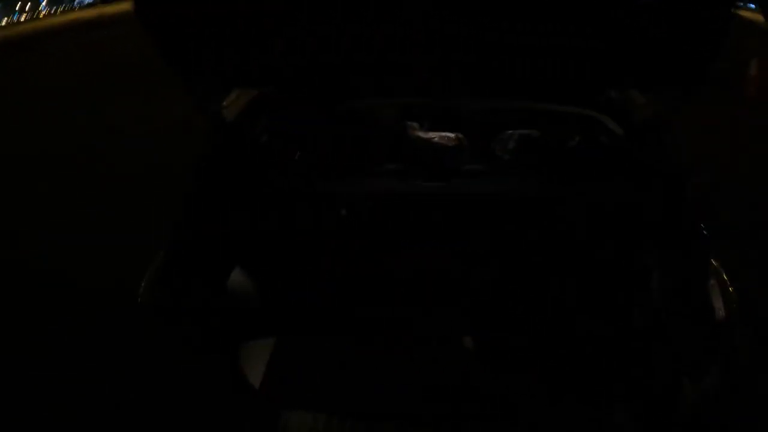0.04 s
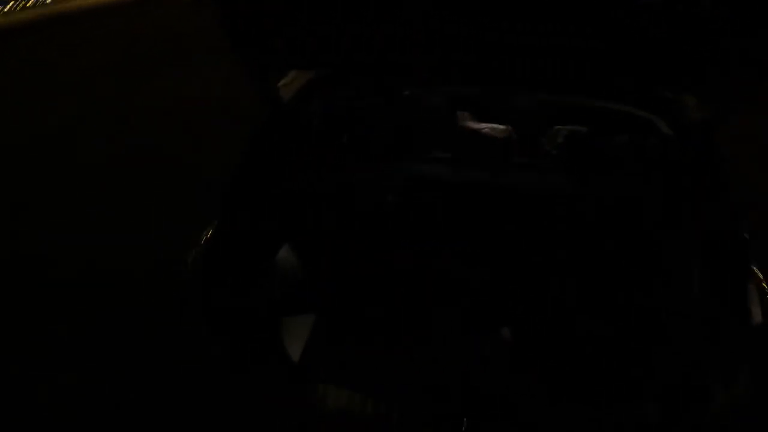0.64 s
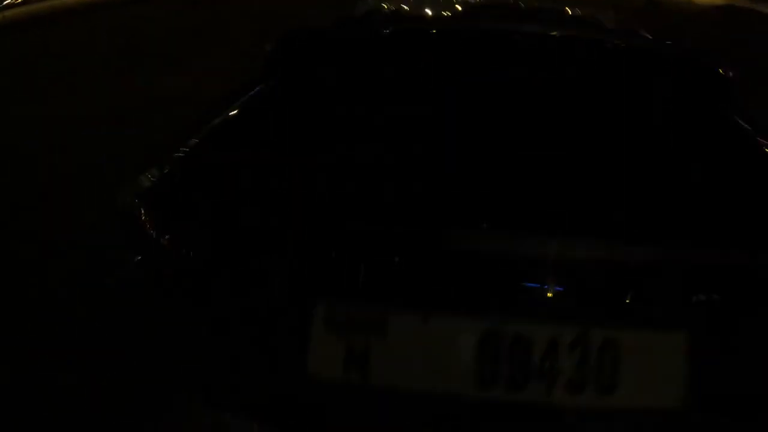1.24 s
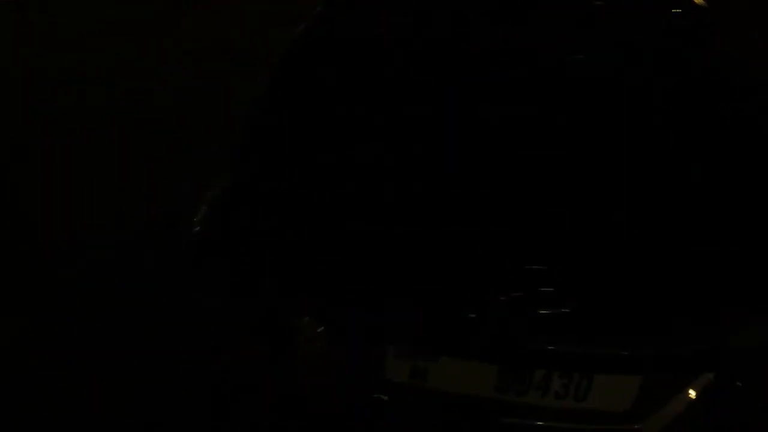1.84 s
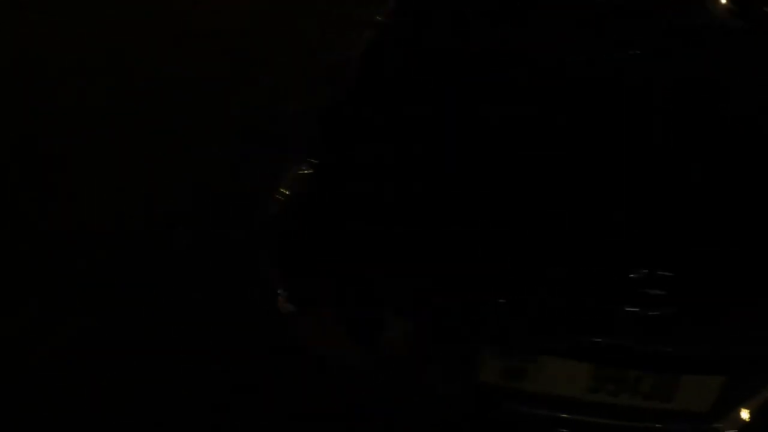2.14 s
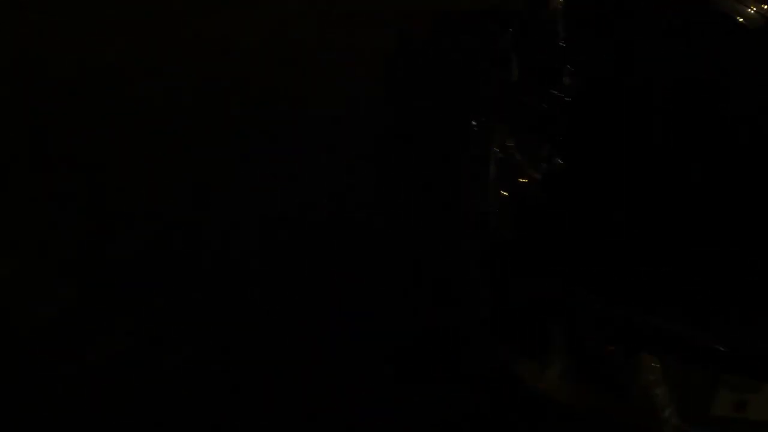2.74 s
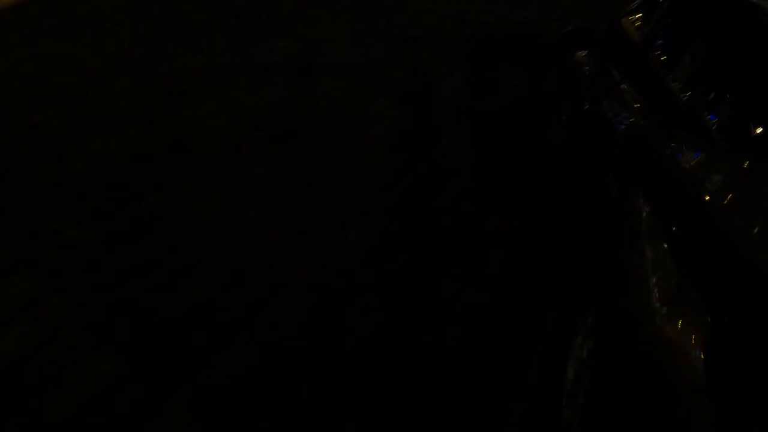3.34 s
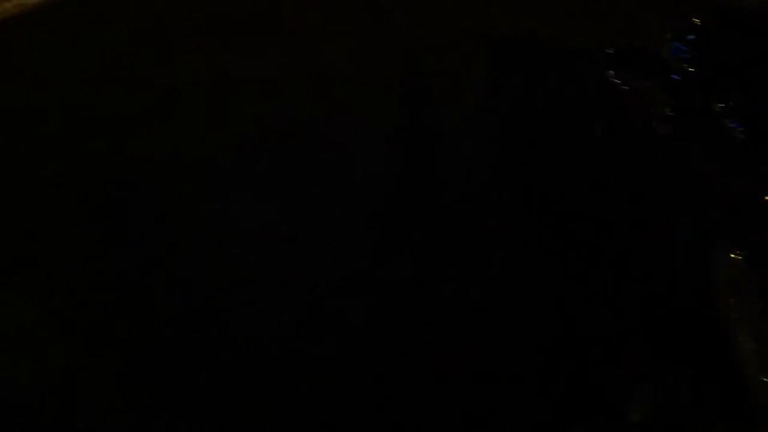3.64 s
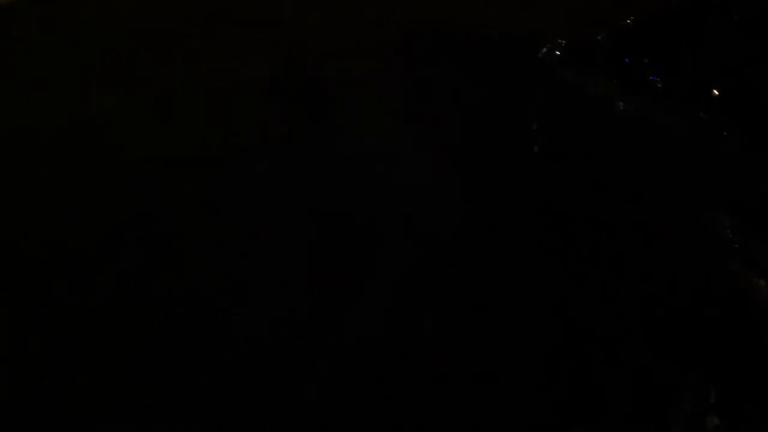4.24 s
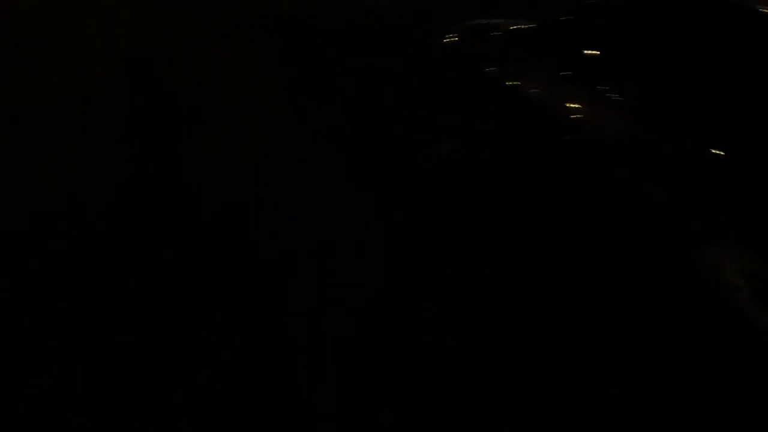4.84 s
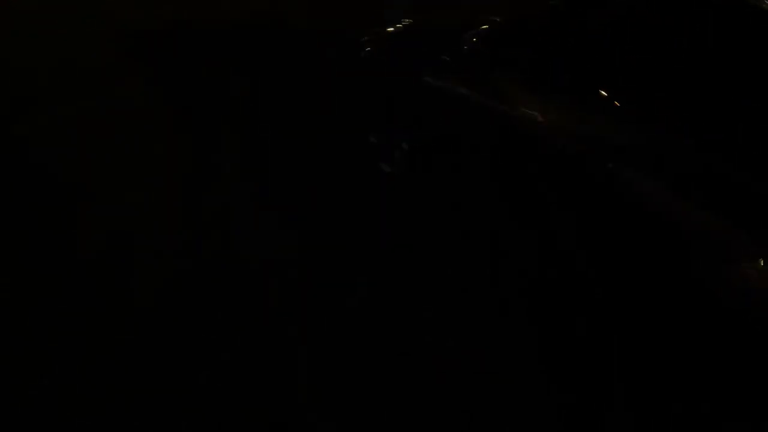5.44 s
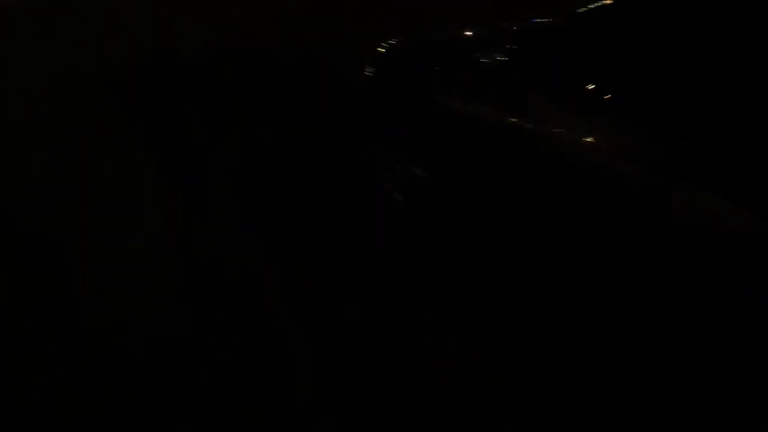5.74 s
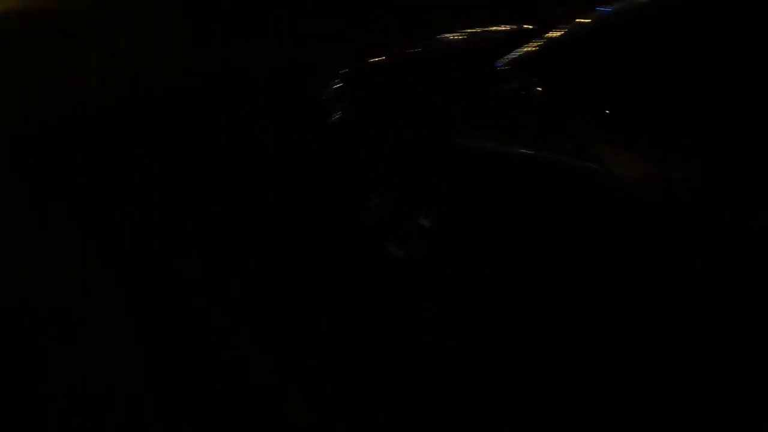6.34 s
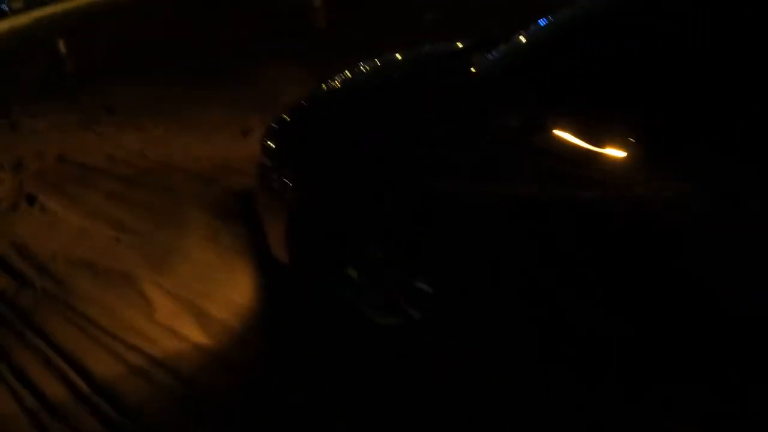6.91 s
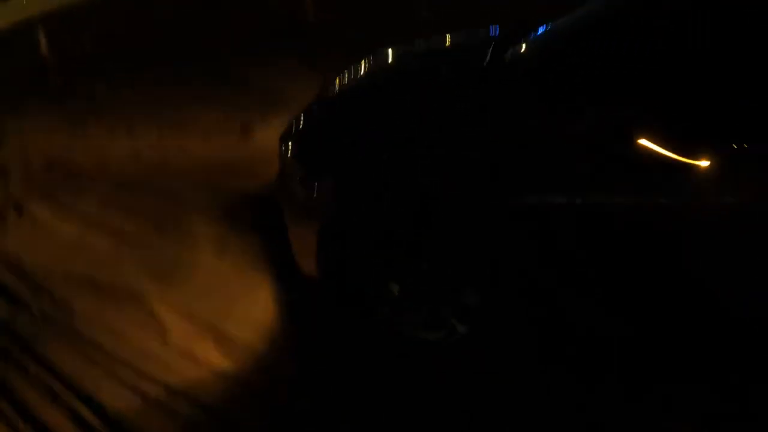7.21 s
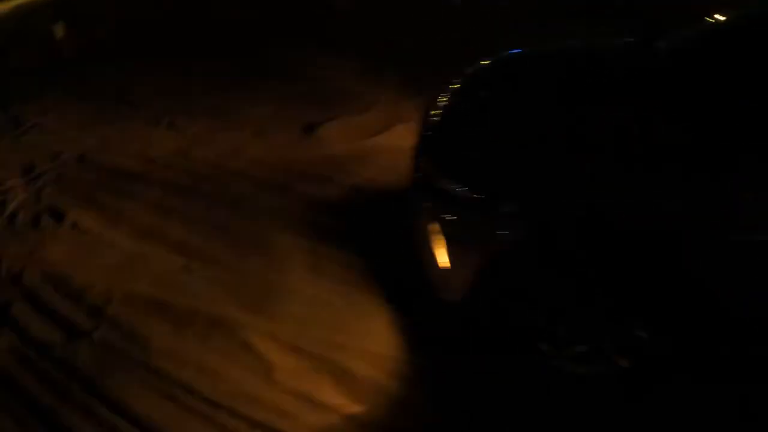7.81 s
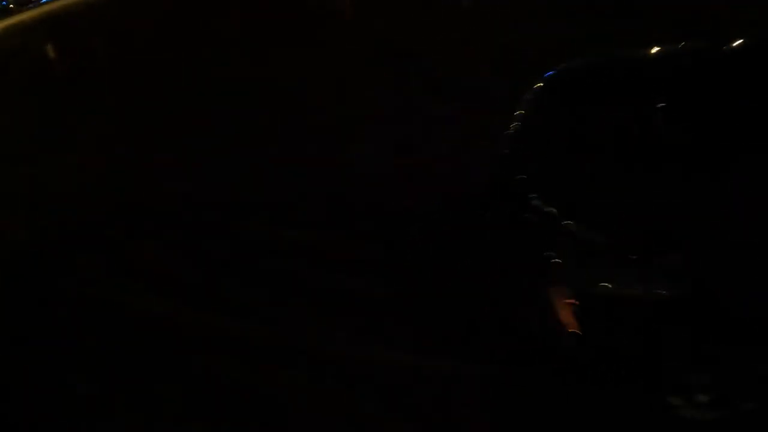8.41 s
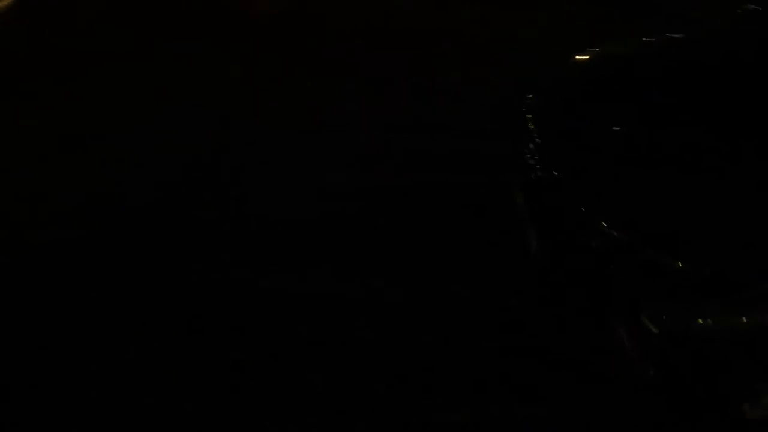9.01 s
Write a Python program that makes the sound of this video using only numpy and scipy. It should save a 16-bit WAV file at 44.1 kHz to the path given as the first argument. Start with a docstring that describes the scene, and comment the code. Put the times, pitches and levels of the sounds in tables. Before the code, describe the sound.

A steady low rumble of road traffic and tyre noise fills an outdoor space throughout. Right at the start, at about 0.1 seconds, a car's door latch opens close ahead with a boxy clack. A dull footstep and a few gritty ticks follow around 0.6 seconds, as a vehicle swells past. At about 1.7 seconds the door slams shut, the loudest sound: a solid thud with a brief metal ring, a deep boom and a short, dull echo. The background dips under the slam and creeps back. From about 2.3 seconds to the end, slow, faint steps scuff over sand, with small clicks of grit and soft swishes of cloth, slightly to the left. Distant engines hum beneath them. Between about 6.5 and 9 seconds another vehicle passes, its tyre roar swelling gently with a faint whine that falls in pitch around 8 seconds.

```python
"""A car's door latch clacks open at night beside a busy road. A moment later the door is swung shut:
seal, latch and striker meet within 30 ms, the steel panels ring and the cabin air booms. An automatic
gain ducks under the slam and creeps back. Traffic rumbles on and one vehicle's tyres sing as it
passes, while slow steps tick and rustle on the sandy ground."""
import sys
import numpy as np
from scipy import signal
from scipy.fft import rfft, irfft, next_fast_len
from scipy.io import wavfile
from scipy.ndimage import uniform_filter1d

SR = 44100
rng = np.random.default_rng(int(sys.argv[2]) if len(sys.argv) > 2 else 0)


def master(y):
    """Save y as 16-bit WAV."""
    cut = np.clip(np.atleast_2d(y).T, -1, 1)
    pcm = np.round(cut * 32767)  # scale
    wavfile.write(sys.argv[1], SR, pcm.astype(np.int16))


N = 399987

# Seal, latch and striker hit home; then the door shudders in its seal and the latch rattles.
# Each row: start in seconds, relative level in dB, treble tilt in dB per octave.
SLAM = [(1.673, -20.5, 1), (1.6758, -20.5, -0.5), (1.6819, -17, -2), (1.6873, -13, 2.5),
        (1.6912, -12.5, 2.5), (1.7002, -11.5, 3), (1.7027, -10, 0.5)]
SHUDDERS = [(1.724, -18, -5), (1.746, -25, -5), (1.7627, -32, 1), (1.7653, -29, 0), (1.773, -20.5, -7),
            (1.786, -21, -5), (1.812, -23, -6.5)]
# The weighty body of each hit. Each row: frequency in Hz, spectral level in dB.
DOOR_COLOUR = [(53, -30), (90, 1.5), (281, -4.5), (530, -3), (700, -10), (792, -9), (880, -12),
               (1060, -10.5), (1370, -15), (1690, -11), (2320, -22.5), (3120, -23.5), (3620, -33),
               (7400, -36), (8800, -45), (14000, -62)]
# The lows hang on longest. Each row: frequency in Hz, 60 dB decay time in seconds.
DOOR_DECAY = [(150, 0.36), (500, 0.1), (1500, 0.084), (4000, 0.065), (11000, 0.038)]
# The ring of the steel panels and latch plate, and the brighter ring of claw and striker.
# Each row: frequency in Hz, level in dB, 60 dB decay time in seconds.
PANEL_MODES = [(154.3, 1.5, 0.38), (242, 4.5, 0.33), (338, 2, 0.071), (424, -1.5, 0.14), (507, 2.5, 0.27),
               (562, 6, 0.063), (603, -5, 0.11), (813, -1, 0.1), (1033, 1.5, 0.16), (1112, 7, 0.075),
               (1360, -2.5, 0.15), (1494, -2, .1), (1690, -2, 0.053), (1970, -10, 0.068), (2460, -10, 0.13)]
CLAW_MODES = [(2510, -4, .07), (2929, -3, .06), (3070, 2, .065), (3900, -9, .04), (4540, -3, 0.038),
              (5260, -5, .04), (5997, -7, .05), (6920, -3, 0.032)]
# The panels ring as the seal lands, harder as the striker catches; the claw touches, takes the
# first notch, then locks. Each row: start in seconds, level in dB.
PANEL_BLOWS = [(1.6758, -26), (1.6885, -23), (1.7031, -18)]
CLAW_CLACKS = [(1.675, -30), (1.6885, -36), (1.7022, -23)]


def door_slam():
    """The seal brushes, latch and striker hit and ring the panels, and the door shudders to rest."""
    seal_brush = arch(1.672, half_length=0.03) * noise(DOOR_COLOUR, N, tilt_db=-6, width=0.4)
    out = amp(-33) * seal_brush
    for s, db, tilt_db in list(SLAM) + list(SHUDDERS):
        add(out, s, amp(db - 0.5) * crack(DOOR_COLOUR, DOOR_DECAY, tilt_db, attack=0.00016))
    for s, db, _ in SLAM:
        add(out, s, amp(db - 8) * skin_push())
    shudder_blows = [(s, db - 20) for s, db, _ in SHUDDERS]
    for s, db in list(PANEL_BLOWS) + shudder_blows:
        add(out, s, amp(db) * ring(PANEL_MODES, attack=0.001, scatter_db=1))
    for s, db in CLAW_CLACKS:
        add(out, s, amp(db) * ring(CLAW_MODES, attack=0.0002, scatter_db=1))
    return out


def skin_push(length_s=0.00051, rise_s=0.00017):
    """One blunt contact shoves the door skin in and lets it spring back."""
    t = np.arange(SR // 50) / SR
    return (t / length_s - 1) * np.exp(-t / length_s) * (1 - np.exp(-t / rise_s))


# The sub under the slam. Each row: frequency in Hz, relative level in dB, 60 dB decay time in seconds.
CABIN_MODES = [(51.2, -3, 0.26), (42.35, -10, 1), (26, -26, 0.26)]


def cabin_boom():
    """The door squeezes the cabin air, which throbs and dies away."""
    out = np.zeros(N)
    add(out, 1.686, amp(1.0) * ring(CABIN_MODES, attack=0.006, scatter_db=-0.5))
    return out


# The pawl lets go, the door pops off its seal, the handle springs back. Each row: start in seconds,
# relative crack level in dB, treble tilt in dB per octave, ring level in dB.
LATCH_HITS = [(0.1203, -14, 3, -17), (.1269, -21, 1, -14), (.173, -35, 3, -42)]
# A boxy clack. Each row: frequency in Hz, spectral level in dB.
LATCH_COLOUR = [(71, -30), (130, -5), (210, -8), (288, 5.5), (420, -2.5), (578, -9.5), (749, -3.5),
                (1050, -7), (1180, -11.5), (2150, -22.5), (2680, -32), (3500, -29.5), (5270, -34),
                (8010, -44), (14000, -70)]
# Its tight tail. Each row: frequency in Hz, 60 dB decay time in seconds.
LATCH_DECAY = [(200, 0.082), (900, 0.08), (2500, 0.092), (10000, 0.066)]
# The hollow door answers. Each row: frequency in Hz, level in dB, 60 dB decay time in seconds.
LATCH_MODES = [(298, 1.5, 0.066), (379, 1.5, 0.059), (687, -22, 0.25), (824, -5, 0.045),
               (1054, -17.5, 0.16), (5210, -24, 0.056)]


def latch_release(bounce_s=0.0067, bounce_loss_db=4.5, bounce_tilt_db=-1.5):
    """The pawl snaps off the striker, rings the hollow door and chatters in weaker, duller rebounds."""
    out = np.zeros((2, N))
    for s, db, tilt_db, ring_db in LATCH_HITS:
        add(out, s, amp(ring_db) * ring(LATCH_MODES, attack=0.0012, scatter_db=1))
        for bounce in range(3):
            tilt = tilt_db + bounce_tilt_db * (bounce > 0)
            contact = crack(LATCH_COLOUR, LATCH_DECAY, tilt, attack=0.00031)
            add(out, s + bounce * bounce_s, amp(db - 5.5 - bounce * bounce_loss_db) * contact)
    return out


# Dull heel knocks and small stone crunches. Each row: start in seconds, level in dB, pitch in Hz.
HEELS = [(.634, -28, 110), (.64, -43, 706), (5.088, -37.5, 915), (5.108, -46, 700), (8.430, -36, 810),
         (8.447, -40, 955)]
PEBBLES = [(5.2002, -45, 2600), (5.2558, -46, 2850), (6.411, -47, 4800)]
# The tone of each. Each row: multiple of the pitch, spectral level in dB.
HEEL_COLOUR = [(.1, -4), (.5, 1.5), (1, 7.5), (1.6, -13), (3.5, -14), (20, -58), (130, -100)]
PEBBLE_COLOUR = [(.3, -23), (.75, -3), (1, 0), (1.3, -4), (1.7, -18), (5, -40)]


def footfalls():
    """Heels knock on the ground and small stones crunch under a sole."""
    out = np.zeros((2, N))
    heel_decay, pebble_decay = [(200, 0.083), (2000, 0.093)], [(1000, 0.034), (5000, 0.029)]
    for s, db, hz in HEELS:
        add(out, s, amp(db) * crack(np.multiply(HEEL_COLOUR, [hz, 1]), heel_decay, 0, attack=0.00086))
    for s, db, hz in PEBBLES:
        add(out, s, amp(db) * crack(np.multiply(PEBBLE_COLOUR, [hz, 1]), pebble_decay, 0, attack=0.0006))
    return out


# Shoe scuffs. Each row: middle and half length in seconds, level in dB, treble tilt in dB per octave.
SCUFFS = [(.47, 0.12, -64, 24), (1.227, 0.021, -40, -4.5), (2.31, 0.13, -56, 1.5), (3.183, 0.032, -52.5, 0),
          (3.39, 0.094, -52.5, -0.5), (3.778, 0.1, -52, -1), (3.92, 0.011, -45, -3),
          (5.854, 0.044, -47, -1), (6.339, 0.03, -40.5, -6.5), (7.057, 0.045, -40.5, -6.5),
          (7.145, 0.066, -45.5, -1), (7.597, 0.013, -43, -3), (8.444, .05, -48.5, -1.5)]
# A dry scrape. Each row: frequency in Hz, spectral level in dB.
SCUFF_COLOUR = [(600, -6), (1500, 2.5), (4000, 2), (6000, -5.5), (7800, -4.5), (8500, -17), (14000, -34)]


def sole_scuffs():
    """Soles slide over sand in short, grainy strokes."""
    out = np.zeros((2, N))
    grain = unit(amp(1.8 * wobble(600)))
    for s, half_length, db, tilt_db in SCUFFS:
        size = int(2 * half_length * SR)
        stroke = np.hanning(size) * grain[round(s * SR):][:size]
        add(out, s - half_length, amp(db) * stroke * noise(SCUFF_COLOUR, size, tilt_db))
    return out


# The loudest clicks of grit. Each row: start in seconds, relative level in dB, treble tilt in dB per
# octave, 60 dB decay time in seconds.
GRIT_TICKS = [(.5912, -27, -4, 0.01), (.594, -34, 3, 0.017), (.6, -33.5, -4.5, 0.051),
              (.6145, -42, 9, .012), (.6245, -34, -4, .025), (1.2155, -31, -4.5, .018),
              (2.331, -51, 12, 0.014), (2.34, -40.5, 2, .025), (2.4385, -33, -3, 0.031),
              (2.465, -49, 9, .015), (2.651, -44, 12, .01), (2.676, -43, 7, .012), (2.683, -41.5, 14, 0.01),
              (3.239, -35, -4.5, .02), (4.929, -40.5, -1.5, 0.034), (6.411, -39, 0, 0.011),
              (6.496, -33, -3, .016), (6.571, -45, 2, .012), (6.833, -35, -6, 0.051)]
# A crisp midrange snap. Each row: frequency in Hz, spectral level in dB.
GRIT_COLOUR = [(300, -10), (1000, 8.5), (2500, 6), (4500, -0.5), (7000, -7.5), (8800, -19), (14000, -37)]


def grit(walk_start_s=2.7, grains_per_s=2.5, spread_db=2.5, rise_s=0.0006):
    """Grit clicks underfoot; once the walk gets going, fainter grains crack at random too."""
    out = np.zeros((2, N))
    walk_s = N / SR - walk_start_s
    grains = [(walk_start_s + when * walk_s, -46 + spread_db * (2 * size - 1), -2, 0.02)
              for when, size in rng.random((int(grains_per_s * walk_s), 2))]
    t = np.arange(SR // 10) / SR
    for s, db, tilt_db, t60 in list(GRIT_TICKS) + grains:
        envelope = np.tanh(t / rise_s) ** 2 * fade(t, t60)
        add(out, s, amp(db + 2.5) * envelope * noise(GRIT_COLOUR, len(t), tilt_db, width=0.81))
    return out


# One swish for each slow stride. Each row: middle and half length in seconds, level in dB,
# first comb peak of the ground reflection in Hz.
STRIDES = [(2.8, 0.27, -59, 4500), (3.71, 0.49, -57.5, 4550), (4.698, 1, -57, 5400),
           (6.147, 0.89, -55, 3730), (7.032, 0.49, -57.5, 3870), (7.75, 0.4, -60, 3600),
           (8.55, 0.65, -57, 3450)]
# Airy sand and cloth. Each row: frequency in Hz, spectral level in dB.
SAND_COLOUR = [(1500, -24), (3000, 0), (4300, 1), (7300, -4), (8500, -13.5), (11000, -18.5), (14000, -37)]


def stride_rustle():
    """Sand and cloth swish with each stride, coloured by a reflection off the ground."""
    out, sample = np.zeros((2, N)), np.arange(N)
    for s, half_length, db, peak_hz in STRIDES:
        sand = noise(SAND_COLOUR, N)
        reflected = np.array([np.interp(sample - SR / peak_hz, sample, side) for side in sand])
        out += amp(db) * arch(s, half_length) * unit(sand + 0.5 * reflected)
    grain = unit(amp(0.89 * wobble(500) + 1.2 * wobble(25)))
    return out * grain


# Pass-bys. Each row: nearest moment and half length in seconds, tyre level in dB, engine level in dB.
PASSES = [(1.2, 1.95, -43.5, -38), (5.393, 0.58, -82, -39), (7.407, 1.32, -42.5, -40),
          (8.9, 0.64, -48, -39)]
# The low, middle and top of the road bed. Each row: frequency in Hz, spectral level in dB.
ENGINE_RUMBLE = [(11, -47), (18, -31), (41, -3.5), (56, -3), (80, -1), (93, -3), (104, -3), (129, -13.5),
                 (149, -7.5), (183, -12.5), (215, -11.5), (242, -14.5), (349, -22), (375, -25.5),
                 (481, -30.5), (600, -32.5), (780, -39), (1320, -120)]
TYRE_ROAR = [(220, -22), (380, -7), (439, -11.5), (479, -6.5), (559, -8), (711, -4), (840, -1.5),
             (950, 2.5), (1130, 0.5), (1520, -2.5), (1920, -4), (2350, -10.5), (2900, -15.5), (3800, -21.5),
             (4940, -43), (8360, -120)]
TYRE_HISS = [(1800, -6.5), (2800, -1), (3300, -6.5), (3720, -1.5), (4200, -4), (5600, -5.5), (7000, -10),
             (8600, -21), (11000, -26), (14000, -39)]


def traffic(tyre_bed_db=-44.5, engine_bed_db=-33.5, hiss_to_roar_db=-17):
    """Engines rumble and tyres roar and hiss along the road, swelling as each vehicle goes by."""
    tyre_power, engine_power = amp(tyre_bed_db) ** 2, amp(engine_bed_db) ** 2
    for s, half_length, tyre_db, engine_db in PASSES:
        near = nearness(s, half_length)
        tyre_power += amp(tyre_db) ** 2 * near
        engine_power += amp(engine_db) ** 2 * near
    tyres, engines = np.sqrt(tyre_power), np.sqrt(engine_power)
    rumble = engines * amp(0.16 * wobble(4.3)) * noise(ENGINE_RUMBLE, N)
    roar = tyres * amp(0.33 * wobble(10)) * noise(TYRE_ROAR, N)
    hiss = tyres * amp(hiss_to_roar_db + 1.55 * wobble(32)) * noise(TYRE_HISS, N, width=0.94)
    return rumble + roar + hiss


def tyre_whine(nearest_s=7.9, half_length_s=2, pitch_hz=487.5, mach=0.122, rear_db=3, flutter_db=2.4):
    """Singing tyres beam sideways and a little to the rear; they swell and sink in Doppler pitch."""
    t = np.arange(N) / SR
    near = nearness(nearest_s, half_length_s)
    receding = (t - nearest_s) / half_length_s * np.sqrt(near)  # -1 coming, +1 going
    beam = near ** 3
    level = beam * amp(-54.3 + rear_db * receding + flutter_db * wobble(12))
    doppler_hz = pitch_hz * (1 - mach * receding)
    return level * tone(doppler_hz * (1 + 0.005 * wobble(45)))


# Distant hums. Each row: start and end in seconds, first and last pitch in Hz, relative level in dB.
ENGINE_DRONES = [(1.4, 6.6, 277, 266, -47), (1.9, 3.77, 352, 348, -50), (4.7, 7.4, 312, 301, -48),
                 (4.6, 7.6, 216, 211, -46.5), (1.503, 10, 101, 104, -42.5), (2.93, 8.54, 81.5, 83, -37.5),
                 (2.7, 7.06, 64, 64.8, -37.5), (3.36, 8.9, 75, 75.6, -41), (5.93, 9.74, 149, 151, -45)]


def far_engines():
    """Far engines drone in and out, each a wavering tone on a slow glide."""
    out, t = np.zeros(N), np.arange(N) / SR
    for start, end, start_hz, end_hz, db in ENGINE_DRONES:
        progress = np.clip((t - start) / (end - start), 0, 1)
        swell = np.sqrt(np.abs(np.sin(np.pi * progress)))
        level = swell * amp(db - 3.5 + 2.5 * wobble(7.7))
        glide_hz = np.interp(t, [start, end], [start_hz, end_hz])
        out += level * tone(glide_hz * (1 + 0.0039 * wobble(12)))
    return out


# A thin whirr at the back. Each row: middle and half length in seconds, level in dB.
WHIRR_SWELLS = [(4.6, 0.97, -61.5), (6.85, 0.78, -57), (8.6, 0.46, -59)]
# Its narrow treble band. Each row: frequency in Hz, spectral level in dB.
WHIRR_COLOUR = [(2800, -22), (3350, -2), (3680, 3.5), (3950, -8), (4800, -9), (5600, -33)]


def whirr():
    """A faint, narrow band of noise swells and fades."""
    swells = sum(amp(db) * arch(s, half_length) for s, half_length, db in WHIRR_SWELLS)
    return swells * noise(WHIRR_COLOUR, N)


# The outdoor space round the car. Each row: frequency in Hz, 60 dB decay time in seconds.
YARD_DECAY = [(60, 0.45), (250, 0.37), (800, 0.22), (2000, 0.19), (8000, .12)]


def yard_echo(x, delay_s=0.03):
    """Nearby cars and walls send back a short, dull tail."""
    colour = [(40, 13), (200, -27.0), (700, 9.5), (2000, -17), (10000, -9.0)]
    tail = dying(noise(colour, SR), YARD_DECAY)
    tail /= np.linalg.norm(tail[0])
    out = np.zeros((2, N))
    add(out, delay_s, signal.fftconvolve(x, tail, axes=1)[:, :N])
    return out


# The stereo image at full width. Each row: frequency in Hz, left-right likeness (1 is mono).
STEREO_LIKENESS = [(60, 1), (250, 0.88), (1000, 0.48), (3000, 0.39), (10000, 0.28)]


def noise(spectrum, size, tilt_db=0, width=1):
    """Coloured stereo noise of rms 1, nearly mono in the bass, tilted per octave above 400 Hz."""
    m = next_fast_len(size, True)
    hz = np.fft.rfftfreq(m, 1 / SR)
    spread = width * np.arccos(np.clip(along(STEREO_LIKENESS, hz), -1, 1)) / 2
    colour = amp(along(spectrum, hz) + tilt_db * np.log2(np.maximum(hz, 400) / 400))
    white = rfft(rng.standard_normal((2, m)))
    mid, side = irfft(white * colour * [np.cos(spread), np.sin(spread)], m)[:, :size]
    return unit(np.array([mid + side, mid - side]))


def crack(colour, decay, tilt_db, attack):
    """The dense, noisy ring of one contact; rms 1 over its first 10 ms, attack in seconds."""
    t = np.arange(SR // 5) / SR
    burst = dying(noise(colour, len(t), tilt_db, width=0.62), decay) * (1 - np.exp(-t / attack))
    return burst / np.std(burst[:, :SR // 100])


def ring(modes, attack, scatter_db):
    """Damped modes, struck at new strengths each time; attack in seconds."""
    hz, db, t60 = np.transpose(modes)[:, :, None]
    t = np.arange(int(t60.max() * SR)) / SR
    strengths = amp(db + scatter_db * rng.standard_normal(db.shape))
    tones = strengths * fade(t, t60) * np.sin(2 * np.pi * hz * t)
    return tones.sum(axis=0) * (1 - np.exp(-t / attack))


def dying(x, decay):
    """Let each band of x die at its own rate, keeping the balance of energy between bands."""
    size = x.shape[-1]
    t, hz, spectrum = np.arange(size) / SR, np.fft.rfftfreq(size, 1 / SR), rfft(x)
    centres, t60s = np.transpose(decay)
    out = np.zeros_like(x)
    for share, t60 in zip(np.eye(len(centres)), t60s):
        band = irfft(spectrum * along(np.c_[centres, share], hz), size)
        out += np.std(band) * unit(band * fade(t, t60))
    return out


def tone(hz):
    """A sine of rms 1 that follows a pitch curve."""
    return unit(np.sin(2 * np.pi * np.cumsum(hz) / SR))


def fade(t, t60):
    """A decay that loses 60 dB every t60 seconds."""
    return np.exp(-np.log(1000) * t / t60)


def nearness(s, half_length):
    """Inverse-square power of something passing in a straight line; 1 when nearest, at time s."""
    return 1 / (1 + ((np.arange(N) / SR - s) / half_length) ** 2)


def arch(s, half_length):
    """A smooth rise and fall around time s."""
    return np.cos(np.pi / 2 * np.clip((np.arange(N) / SR - s) / half_length, -1, 1))


def wobble(rate):
    """A smooth random curve, rate knots a second."""
    knots = rng.standard_normal(int(N * rate / SR) + 4)
    fine = signal.resample(knots, 8 * len(knots))
    return np.interp(np.arange(N) * (8 * rate / SR), np.arange(len(fine)), fine)


def amp(db):
    """Decibels to gain."""
    return np.exp(np.asarray(db) * (np.log(10) / 20))


def unit(x):
    """Scale to rms 1."""
    return x / np.sqrt(np.mean(x ** 2) + 1e-20)


def along(points, hz):
    """Read (Hz, value) points on a log frequency axis."""
    freqs, values = np.transpose(points)
    return np.interp(np.log(hz + 1), np.log(freqs + 1), values)


def filtered(x, response):
    """Shape x by a response, given as a function of Hz."""
    size = x.shape[-1]
    m = next_fast_len(size + SR // 8)
    return irfft(rfft(x, m) * response(np.fft.rfftfreq(m, 1 / SR)), m)[..., :size]


def add(track, s, sound):
    """Mix a sound into the track from time s on."""
    start = max(round(s * SR), 0)
    track[..., start:start + sound.shape[-1]] += sound[..., :N - start]


def placed(x, left_db, lead_radians):
    """Pan by a level and phase offset between left and right; the deep bass stays nearly in phase."""
    def phase_offset(hz):
        lead = lead_radians * hz / (hz + 300)
        return np.exp(0.5j * lead * [[1], [-1]])
    return filtered(x, phase_offset) * amp([[left_db / 2], [-left_db / 2]])


def gain_control(x, threshold_db, release_db_per_s):
    """A loud sound pulls the gain down at once; it then climbs steadily back."""
    power = np.abs(uniform_filter1d(np.mean(x ** 2, axis=0), SR // 80))
    excess_db = np.maximum(10 * np.log10(power + 1e-12) - threshold_db, 0)
    climb_db = release_db_per_s * np.arange(N) / SR
    return x * amp(climb_db - np.maximum.accumulate(excess_db + climb_db))


def scene():
    """The door sits ahead in its short echo; road, steps and cabin boom lean a little to the left."""
    car = latch_release() + door_slam()
    ahead = placed(car + amp(-22.5) * yard_echo(car), left_db=0.3, lead_radians=-0.8)
    road = traffic() + tyre_whine() + far_engines()
    around = road + stride_rustle() + whirr() + cabin_boom() + footfalls() + sole_scuffs() + grit()
    return ahead + placed(around, left_db=2.5, lead_radians=-0.37)


def record(dry):
    """Automatic gain ducks the slam, overloads clip, and the top end stops at 14.4 kHz."""
    ducked = gain_control(dry, threshold_db=-11.0, release_db_per_s=5.0)
    return filtered(np.clip(ducked, -1, 1), lambda hz: hz < 14400)


dry = scene()
out = record(dry)
master(out)
```